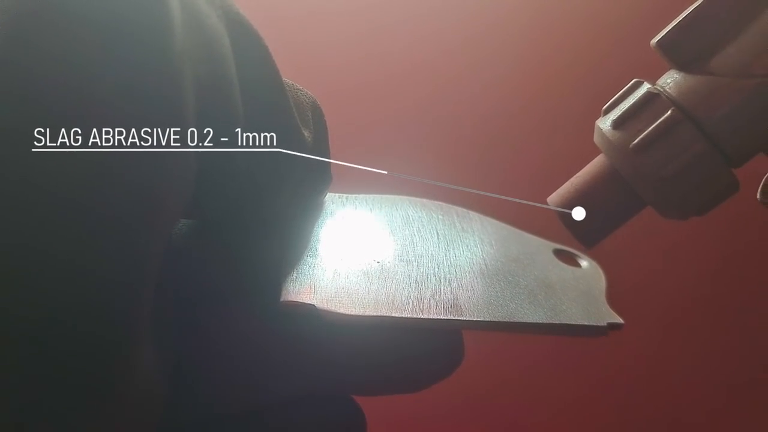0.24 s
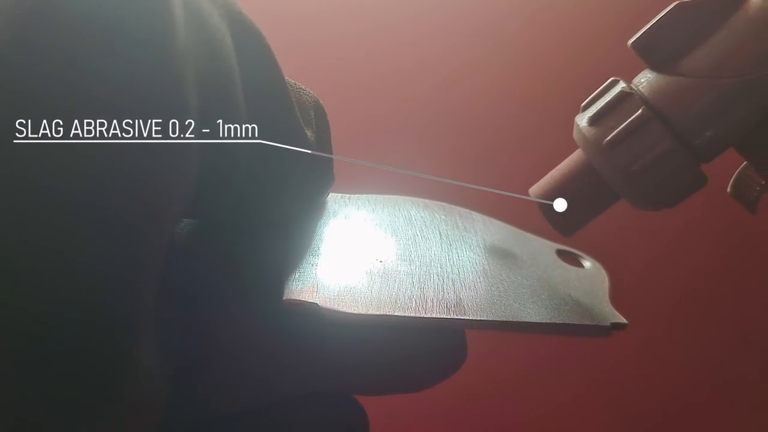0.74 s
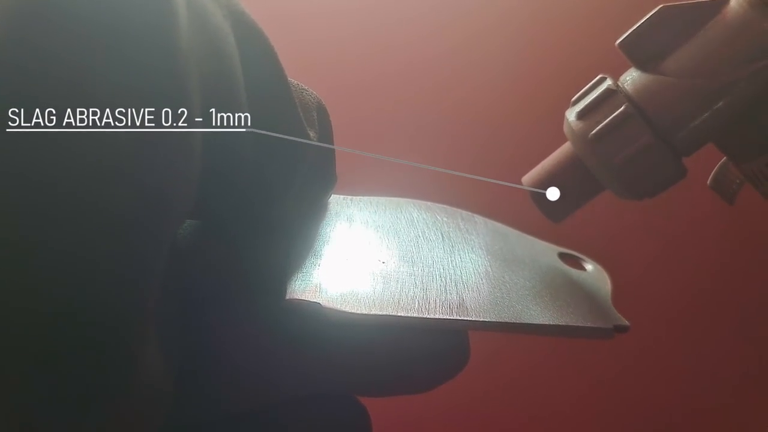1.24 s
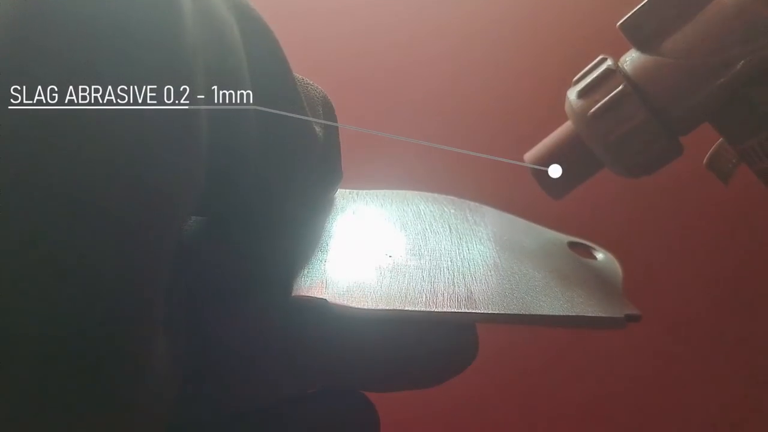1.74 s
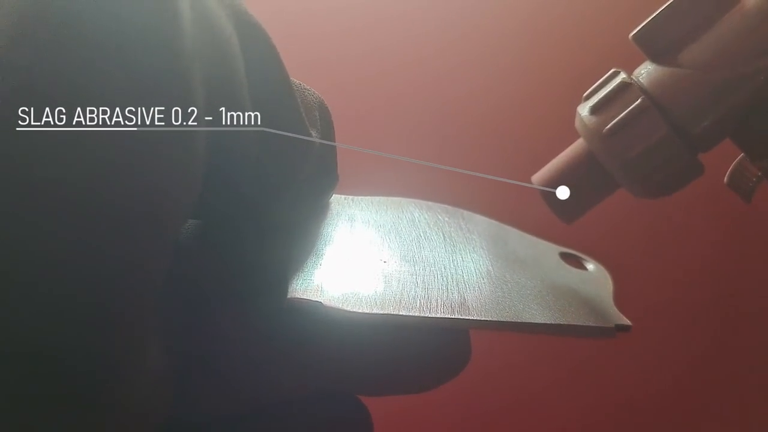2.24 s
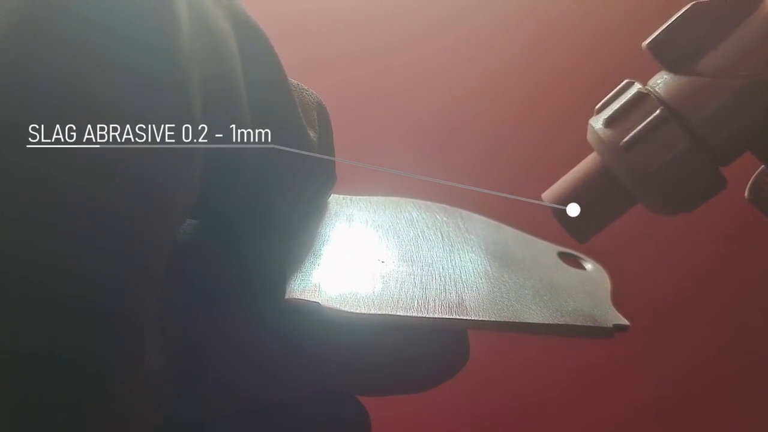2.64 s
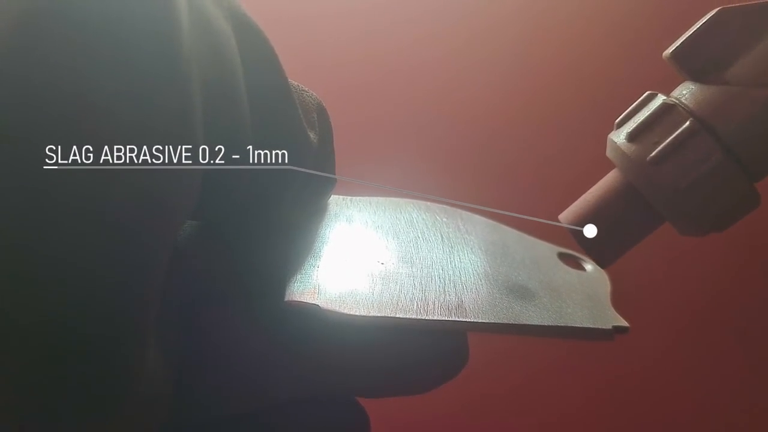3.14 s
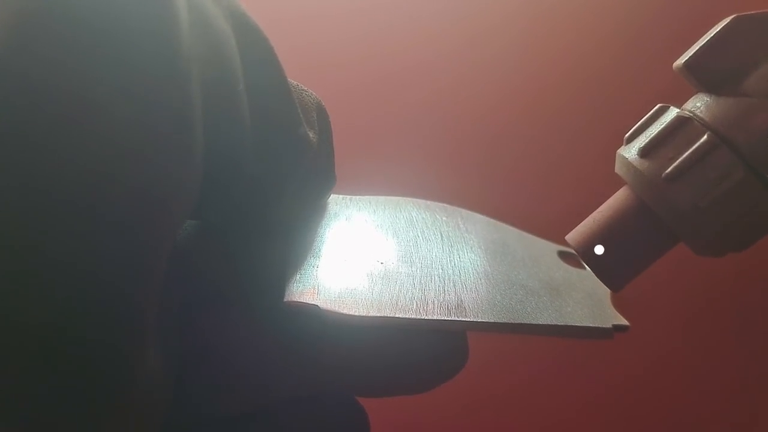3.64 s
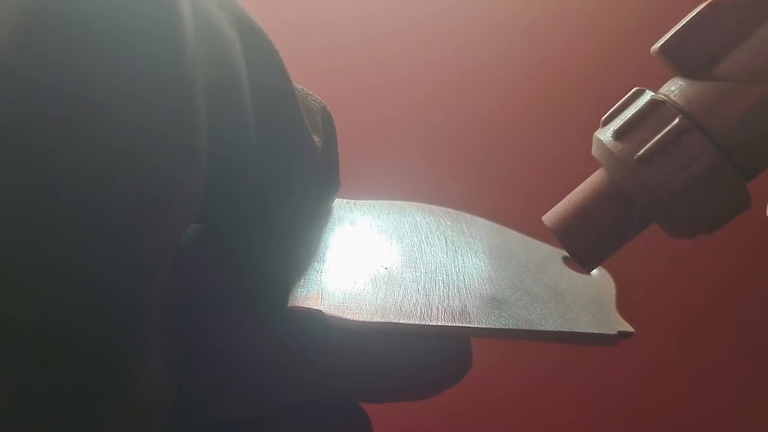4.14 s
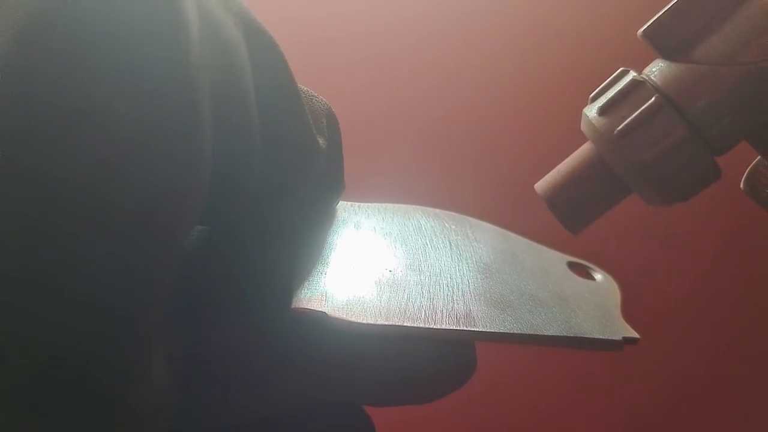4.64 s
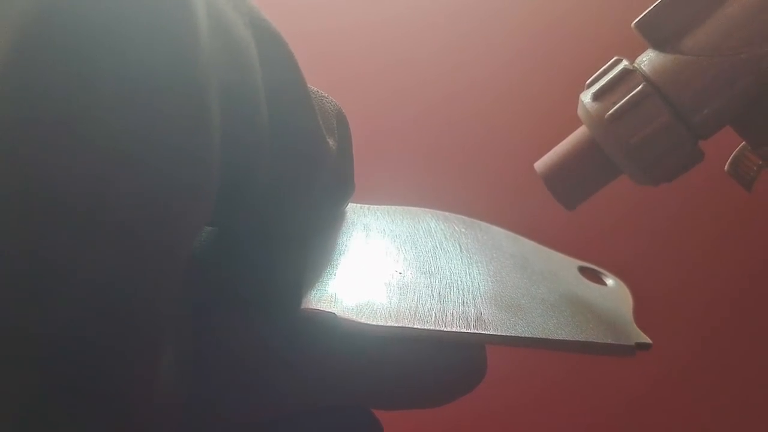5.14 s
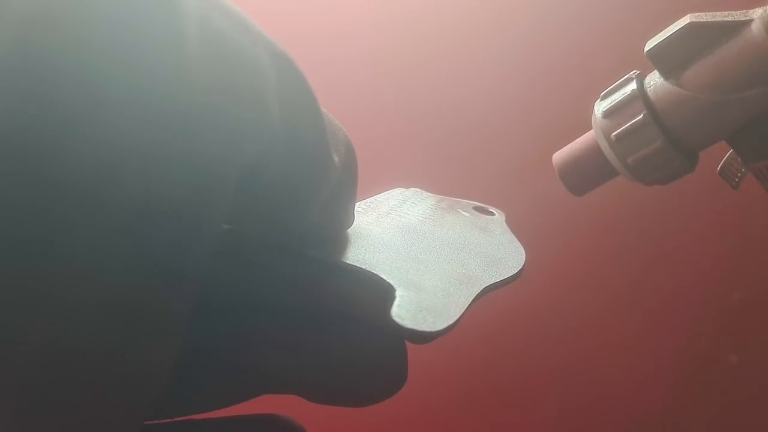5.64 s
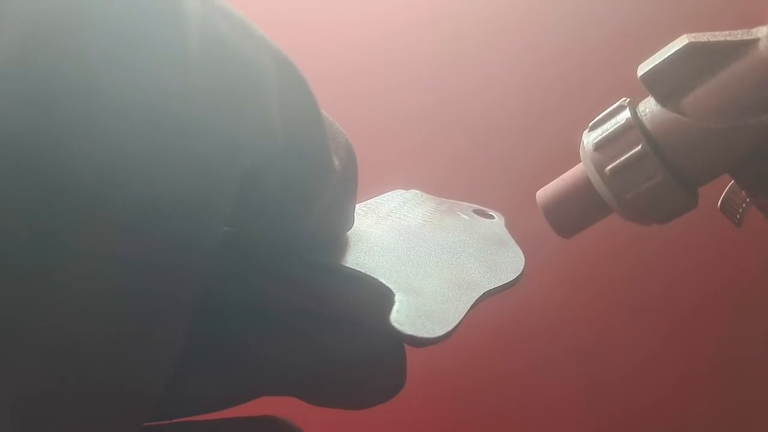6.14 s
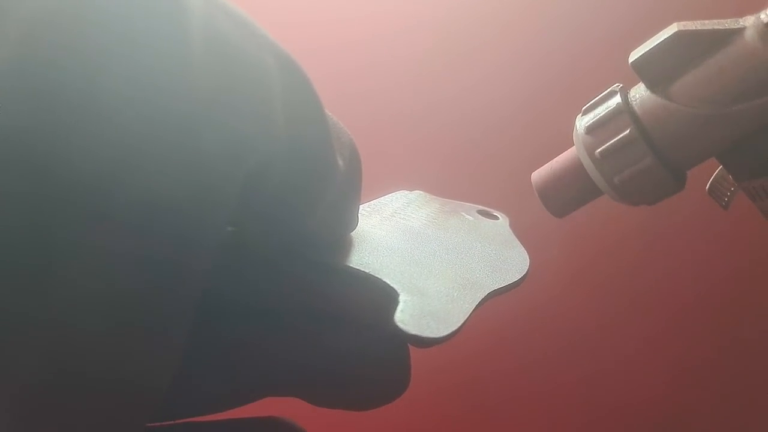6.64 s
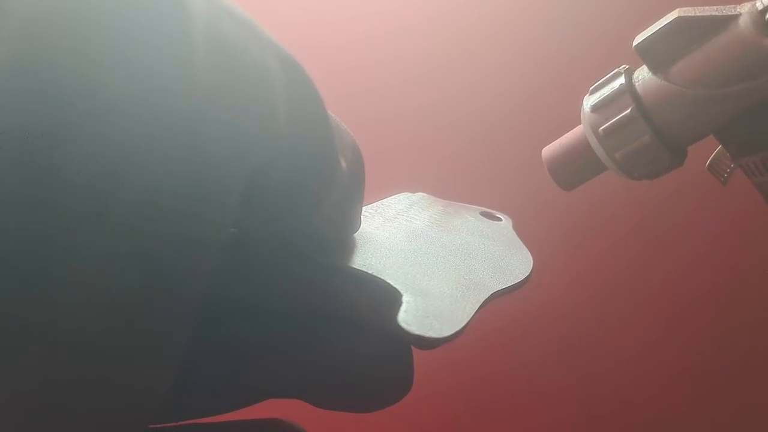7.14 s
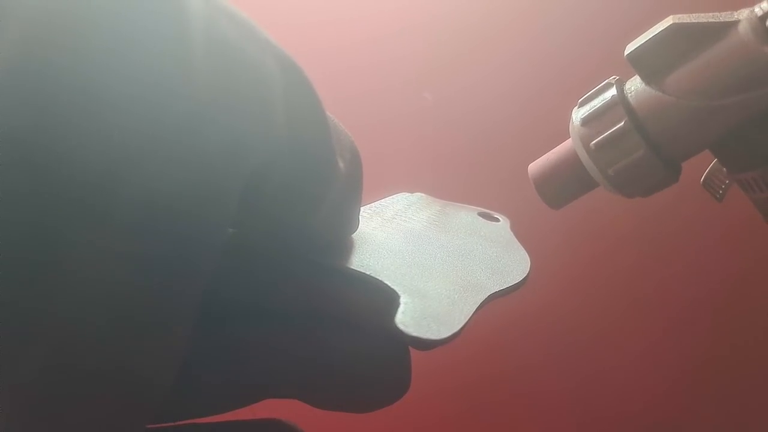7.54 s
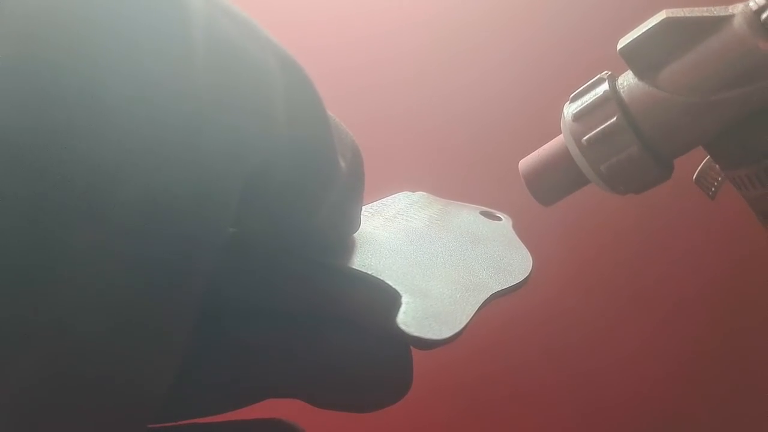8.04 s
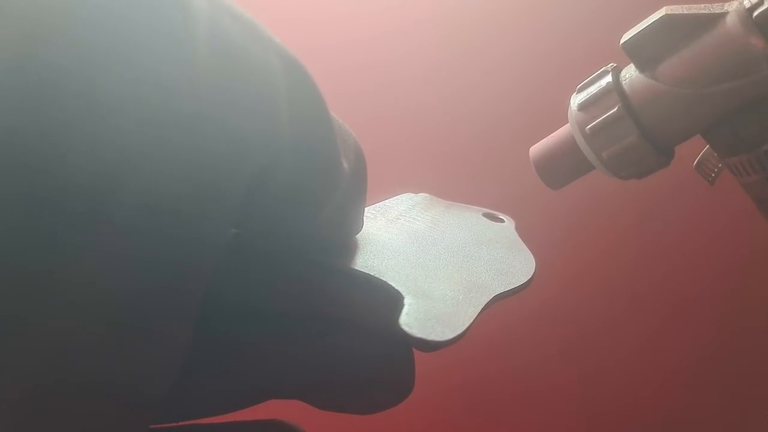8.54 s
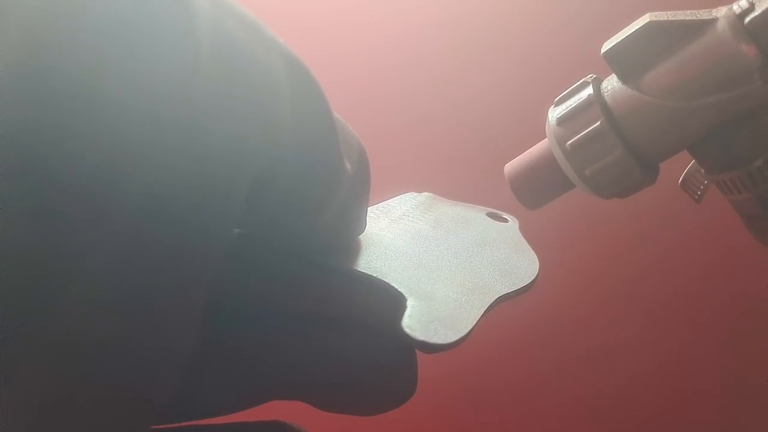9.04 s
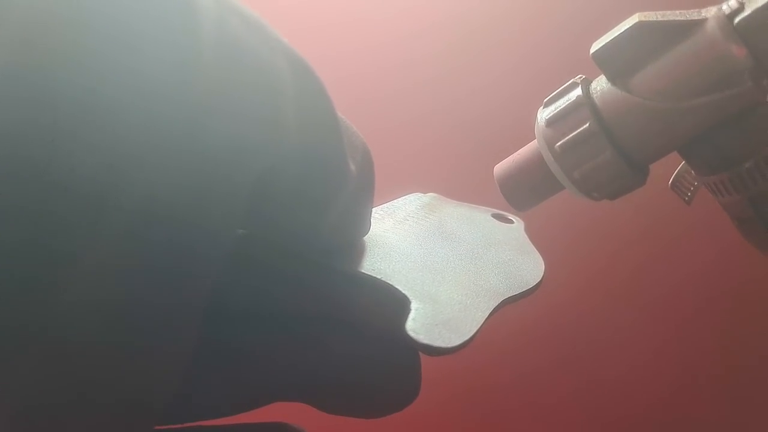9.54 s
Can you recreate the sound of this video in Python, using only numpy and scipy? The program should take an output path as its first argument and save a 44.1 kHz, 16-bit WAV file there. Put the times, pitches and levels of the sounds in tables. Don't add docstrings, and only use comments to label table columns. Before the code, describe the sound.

A shrill, dense hiss of compressed air is running from the first instant and never stops, very bright with little bass, louder on the right because the gloved hand and part shade the left. The close stereo microphone sits inside a small metal cabinet with a short, tight reverberation. Grit sizzles on the steel in swells around 1.2, 1.8, 3.4 and 3.9 seconds. Rebounding grains crackle and tick, thickest from 1.5 to 1.9, with soft low puffs of air on the left near 0.7, 1.3 and 3.7. At about 5.2 the gun and part abruptly change place: buffeting ends, the left hiss drops, pelting thins and the sizzle becomes lower and duller. Strong bursts of sizzle come near 5.6 and 7.1, a calmer stretch around 7.7 to 8.1, then more passes at 8.5 and 9.7. Panels resonate faintly and a fan motor hums very quietly throughout, with the hiss still going at the end.

```python
import sys
import numpy as np
from scipy import signal
from scipy.fft import rfft, irfft, next_fast_len
from scipy.io import wavfile
from scipy.ndimage import map_coordinates

SR = 44100
rng = np.random.default_rng(int(sys.argv[2]) if len(sys.argv) > 2 else 0)


def to_wav(sig):
    pcm = np.clip(np.atleast_2d(sig), -1, 1) * 32767
    pcm = np.round(pcm).astype(np.int16)
    wavfile.write(sys.argv[1], SR, pcm.T)


def gain_from_db(level_db):
    decades = np.asarray(level_db, float) / 20
    return 10 ** decades


N = 431722
MOVE_S = 5.2
ECHO_LENGTH, HOP = 4096, 14336
TOP_HZ = 15770
PER_HZ = np.sqrt(SR / 2)

# (frequency [Hz], rms level [dB])
MOTOR_LINES = [
    (92, -68.5),
    (322.3, -72.5),
]
# (frequency [Hz], width [Hz], level [dB])
DUCT_MODES = [
    (335, 12, -8),
    (397.5, 15, 0),
    (486, 20, -7),
]
# (frequency [Hz], left level [dB per Hz], right level [dB per Hz])
RUMBLE_SPECTRUM = [(20, -108, -108), (50, -93.5, -96), (90, -102, -92.5), (182, -106, -106),
                   (317, -99, -99), (463, -100, -100), (526, -112, -112)]
# (frequency [Hz], level [dB per Hz])
GUST_SPECTRUM = [(20, -19), (60, 7.5), (120, 0), (250, -9.5), (500, -14)]
# (time [s], half length [s], level [dB])
PUFFS = [
    (.72, .12, -70),
    (1.25, 0.054, -72),
    (2.3, .08, -81),
    (3.68, 0.032, -67),
    (4.98, 0.063, -80),
]
BUFFET_DB, BUFFET_SWING_DB = -71, 0.6
# (frequency [Hz], left level [dB per Hz], right level [dB per Hz])
ROAR_BEFORE = [(165, -86, -100.5), (350, -93, -96.5), (603, -91, -93.5), (1000, -93, -91),
               (1590, -91.5, -99), (2300, -90, -94), (3130, -87, -88.5), (4500, -86.5, -82.5),
               (5260, -85.5, -84), (5900, -81, -79), (6130, -102, -79), (7580, -103, -81),
               (8100, -122, -102), (8450, -99, -82)]
ROAR_AFTER = [(174, -104, -104), (260, -102, -102), (348, -96, -95), (533, -99.5, -98.5), (710, -92.5, -94),
              (990, -95, -94), (1590, -99.5, -88), (2300, -90.5, -90), (2830, -92.5, -91), (3350, -99, -86),
              (4170, -83, -89), (4680, -103, -80), (5700, -97, -81), (5940, -99, -78), (7220, -91, -77),
              (8340, -110, -97), (9400, -85, -76)]
# (frequency [Hz], width [Hz], level [dB])
WALL_MODES_BEFORE = [(1300, 30, -12), (1800, 30, -12), (2000, 50, -11), (2290, 40, -9), (2470, 50, -8),
                     (2740, 50, -6), (3120, 120, -7), (3700, 100, -6), (4480, 86, -10), (4950, 60, -6),
                     (5350, 60, -6), (5550, 200, -5), (5780, 200, -5), (6240, 75, -2), (6760, 90, -3),
                     (7080, 70, -4)]
WALL_MODES_AFTER = [(720, 16, -11), (930, 50, -12), (1300, 36, -9), (1500, 90, -12), (1790, 60, -8),
                    (1885, 40, -10), (2127, 50, -8), (2296, 40, -5), (2478, 44, -3), (2605, 35, -5),
                    (2702, 35, -4), (2830, 70, -4), (3055, 60, -3), (3200, 80, -5), (3420, 90, 0),
                    (3700, 90, -3), (3900, 50, -4), (4315, 50, -3), (4570, 70, 0), (4835, 50, -4),
                    (5330, 60, -6)]
# (time [s], peak level [dB], port [0 left, 1 right])
LARGE_GRAINS = [(0.1525, -28, 0), (0.179, -31, 0), (.258, -31, 0), (.566, -43, 0), (0.576, -39, 0),
                (.872, -35, 0), (1.083, -38, 0), (.492, -43, 0), (1.071, -38, 0), (1.273, -36, 0),
                (1.397, -34, 0), (6.961, -35, 0), (.966, -34, 1), (.345, -42, 0), (1.478, -37, 0),
                (1.914, -34, 0), (1.933, -34, 0), (2.583, -43, 0), (3.242, -34, 0), (3.644, -34, 0),
                (4.054, -39, 0), (4.265, -40, 1), (4.33, -37, 0), (5.444, -42, 1), (5.561, -40, 1)]
# (time [s], half length [s], level [dB])
SHOWERS = [(1.08, 0.014, -59), (1.27, 0.036, -60), (1.5, .02, -58), (1.555, 0.037, -52),
           (1.61, 0.027, -51.5), (1.7, 0.05, -57), (1.79, .02, -54), (1.835, 0.035, -51), (1.9, 0.022, -58),
           (3.25, .03, -70), (4.01, 0.095, -58), (4.45, 0.066, -61), (5.36, 0.073, -64), (5.55, .09, -53.5),
           (6.1, 0.056, -59), (6.35, .14, -62), (6.95, 0.08, -64), (7.17, 0.037, -55), (7.75, 0.15, -59),
           (8.6, .12, -72), (9.2, 0.34, -62)]
DRIZZLE_DB, DRIZZLE_SWING_DB = -61, 0.5
# (frequency [Hz], level [dB per Hz])
GRAIN_SPECTRUM = [(90, 1), (300, -2), (1500, -3), (4000, -4.5), (7000, -2), (10000, -0.5)]
# (time squarest [s], half length [s], sizzle level [dB], push on the walls [dB])
PASSES = [(0, .06, -52, -3), (1.175, 0.28, -51.5, 0), (1.577, 0.12, -52.5, 3), (1.84, 0.23, -50, -3),
          (2.1, 0.1, -58, -3), (2.295, 0.1, -62, -4), (3.4, 0.46, -53, -1), (3.848, 0.12, -50, 0),
          (4.15, 0.21, -53, -9), (5.045, 0.067, -52, 2.5), (5.274, 0.082, -48, 1), (5.415, 0.072, -52, -3),
          (5.576, 0.13, -43, -5), (5.78, 0.12, -49, -1.5), (6.858, 0.15, -55, 1.5), (7.136, 0.11, -44.5, 0),
          (7.35, 0.11, -59, 2), (7.65, 0.1, -69, -1), (8.11, 0.18, -68, 1.5), (8.477, 0.14, -51.5, 0.5),
          (8.758, 0.13, -54, 1), (9.297, 0.26, -58, 3), (9.7, 0.57, -52.5, -0.5)]
GRAZE_DB, WALL_REST_DB = -60.5, -5
# (frequency [Hz], left level [dB per Hz], right level [dB per Hz])
PART_BEFORE = [(2000, -102, -106), (2980, -91, -87), (3970, -84, -71.5), (4800, -104, -72.5),
               (5600, -92, -73), (6400, -87, -67), (7440, -84, -66), (7900, -103, -84)]
PART_AFTER = [(1240, -100, -101), (2080, -100, -98), (2480, -80, -77.5), (2750, -83, -81.5),
              (3080, -86, -81), (3400, -67.5, -77), (4000, -85, -72), (4570, -75, -71), (5050, -81, -68),
              (5600, -88, -70), (6230, -88, -76), (6950, -90, -71), (8250, -91, -77)]
# (frequency [Hz], left level [dB per Hz], right level [dB per Hz])
JET_SPECTRUM = [(8200, -87, -83), (9000, -88, -82.5), (9400, -86, -79), (9900, -78, -75), (10800, -76, -69),
                (11600, -74, -65), (12500, -73, -64.5), (13400, -69.5, -66), (14200, -71, -68),
                (15000, -74, -69), (15600, -75.5, -71)]
# (time [s], left level [dB], right level [dB], left dulling [dB], right dulling [dB])
AIM = [(0.0, -4.8, 0.5, -0.0, -1), (0.3, -6, -1.5, 2.5, 1), (0.6, -5.5, 0.2, 0.5, -1.5),
       (1.0, -2.5, 0, -2.2, -0.5), (1.3, -4.3, -0.5, 1, 0.5), (1.55, -7, 0, 2.6, 0.3),
       (1.85, -7.5, 0, 2, 0.5), (2.3, -4.2, -1.3, 0, 0.5), (2.6, -4, -0.3, -0.5, -1.5),
       (3.1, -4.5, -0.1, 0, -1), (3.6, -6, 0.3, -1, -0.5), (4.1, -5.3, 0.0, 1, -0.5),
       (4.6, -5, -0.4, 1.5, 0.4), (4.9, -4.5, -0.4, 0, 0), (5.14, -4.8, 1, -1.3, -0.5),
       (5.26, -10, -0.5, 2, 0.5), (5.55, -9.5, -0.0, 0.5, -0.3), (5.9, -9, -1, 0, 0.6),
       (6.3, -7.5, 0, -1, 0), (7.0, -9.5, -0.7, 1.0, 1), (7.9, -7.9, -0.0, -1.6, -1.3),
       (8.5, -8.5, -0.5, 0.5, 1.3), (9.1, -8.5, 0.1, 1, -1), (9.79, -8, 0.5, 1, 0)]
JET_DB = -28.5
KNEE_HZ, KNEE_WIDTH_HZ = 12000, 900


def unit(x):
    return x / np.sqrt(np.mean(np.abs(x) ** 2) + 1e-20)


def shape(points, hz):
    f, *columns = np.transpose(points)
    below = np.maximum(np.log2(f[0] / (hz + 1)), 0)
    above = np.maximum(np.log2((hz + 1) / f[-1]), 0)
    octaves_outside = below + above
    return gain_from_db([np.interp(np.log(hz + 1), np.log(f), c) - 40 * octaves_outside for c in columns])


def coloured(x, points):
    m = next_fast_len(N + ECHO_LENGTH)
    gain = shape(points, np.fft.rfftfreq(m, 1 / SR))
    return irfft(rfft(x, m) * gain, m)[..., :N]


def curves(rows):
    s, *columns = np.transpose(rows)
    return [np.interp(np.arange(N) / SR, s, c) for c in columns]


def wobble(rate):
    coarse = np.arange(0, N + 64, 64)
    knots = rng.standard_normal(int(N * rate / SR) + 4)
    smooth = map_coordinates(knots, [coarse * rate / SR])
    return np.interp(np.arange(N), coarse, smooth)


def swells(rows, rest_db):
    coarse = np.arange(0, N + 64, 64)
    power = gain_from_db(2 * rest_db)
    for s, half, db in rows:
        power = power + gain_from_db(2 * db) * np.exp(-((coarse / SR - s) / half) ** 2)
    return np.interp(np.arange(N), coarse, 10 * np.log10(power))


def moved():
    return np.clip((np.arange(N) / SR - MOVE_S) / 0.024, 0, 1)


def in_cabinet(t60, moving, count):
    decay = gain_from_db(-60 * np.arange(ECHO_LENGTH) / SR / t60)
    steps = N // HOP + 2
    spots = rng.standard_normal((count, steps + 1, HOP))
    pieces = np.concatenate([spots[:, :-1], spots[:, 1:]], axis=2)
    fade = np.sin(np.pi * np.arange(2 * HOP) / (2 * HOP))
    m = 2 * HOP + ECHO_LENGTH
    changing = rfft(rng.standard_normal((2, count, steps, ECHO_LENGTH)) * decay, m)
    place = (np.arange(steps) * HOP > MOVE_S * SR).astype(int)
    still = rfft(rng.standard_normal((2, count, 2, ECHO_LENGTH)) * decay, m)[:, :, place]
    share = np.clip(moving, 0, 1)
    paths = np.sqrt(share) * changing * rfft(pieces * fade, m)
    paths = paths + np.sqrt(1 - share) * still * rfft(pieces * fade ** 2, m)
    answers = irfft(paths.sum(axis=1), m)
    ports = np.zeros((2, steps + 3, HOP))
    for k in range(3):
        slab = answers[:, :, k * HOP:(k + 1) * HOP]
        ports[:, k:k + steps, :slab.shape[2]] += slab
    return unit(ports.reshape(2, -1)[:, HOP:HOP + N])


def ringing(modes, alike):
    m = next_fast_len(N + ECHO_LENGTH)
    f = np.fft.rfftfreq(m, 1 / SR)
    power = sum((gain_from_db(db) / (1 + (2 * (f - hz) / width) ** 2)) ** 2 for hz, width, db in modes)
    blast = alike * rng.standard_normal(N) + rng.standard_normal((2, N))
    return unit(irfft(rfft(blast, m) * np.sqrt(power), m)[:, :N])


def fan():
    t = np.arange(N) / SR
    slip = 0.22 * wobble(2.87)
    lines = np.zeros(N)
    for hz, db in MOTOR_LINES:
        level = np.sqrt(2) * gain_from_db(db + 0.59 * wobble(3.2))
        lines += level * np.sin(2 * np.pi * hz * t + slip * hz / 220)
    whistle = gain_from_db(-76.0 + 1.5 * wobble(4)) * ringing(DUCT_MODES, alike=4.9)
    air = rng.standard_normal(N) + 0.29 * rng.standard_normal((2, N))
    rumble = PER_HZ * coloured(unit(air), RUMBLE_SPECTRUM)
    return lines * gain_from_db([[-.6], [.6]]) + whistle + rumble


def buffet():
    gusts = coloured(rng.standard_normal(N), GUST_SPECTRUM)[0]
    lumps = unit(gain_from_db(2.2 * wobble(18)) * gusts)
    gust_db = swells(PUFFS, BUFFET_DB) + BUFFET_SWING_DB * wobble(5.17)
    return gain_from_db(gust_db + 9.5) * (1 - moved()) * lumps * [[1], [.04]]


def roar():
    swirl = in_cabinet(t60=0.084, moving=0.64, count=2)
    early = coloured(swirl, ROAR_BEFORE)
    late = coloured(swirl, ROAR_AFTER)
    surge_db = .8 * wobble(8) + .8 * wobble(15)
    return PER_HZ * gain_from_db(surge_db - 3.0) * (early * (1 - moved()) + late * moved())


def walls():
    pushes = [(s, half, push) for s, half, _, push in PASSES]
    drive = gain_from_db(swells(pushes, WALL_REST_DB) + 0.94 * wobble(9))
    early = gain_from_db(-57.0) * np.sqrt(1 - moved()) * ringing(WALL_MODES_BEFORE, alike=0.48)
    late = gain_from_db(-56.5) * np.sqrt(moved()) * ringing(WALL_MODES_AFTER, alike=0.5)
    return drive * (early + late)


def pelting():
    hit = rng.random((2, N)) < 2500 / SR
    size_db = np.minimum(3.55 * rng.exponential(1, (2, N)), 17)
    sizes = gain_from_db(size_db) * rng.choice([-1, 1], (2, N))
    clumps = gain_from_db(1.7 * wobble(40) + 1.75 * np.array([wobble(30), wobble(30)]))
    grains = unit(coloured(hit * sizes * clumps, GRAIN_SPECTRUM))
    fall_db = swells(SHOWERS, DRIZZLE_DB) + DRIZZLE_SWING_DB * wobble(23)
    port_db = np.array([[6.5], [5.0]]) - np.array([[9.0], [5.5]]) * moved()
    shower = gain_from_db(fall_db + port_db) * grains
    big = np.zeros((2, N))
    for s, db, port in LARGE_GRAINS:
        big[int(port > .5), round(s * SR)] = gain_from_db(db + 17.0)
    return shower + coloured(big, GRAIN_SPECTRUM)


def part():
    grit = in_cabinet(t60=0.085, moving=0.79, count=2)
    early = unit(coloured(grit, PART_BEFORE))
    late = unit(coloured(grit, PART_AFTER))
    sizzle = early * (1 - moved()) + late * moved()
    sweep_db = swells([row[:3] for row in PASSES], GRAZE_DB)
    return gain_from_db(sweep_db + 1.0 + 0.62 * wobble(12) + 0.9 * wobble(22)) * sizzle


def jet():
    left_db, right_db, *dull_db = np.array(curves(AIM))
    dull_db = np.array(dull_db)
    hiss = coloured(in_cabinet(t60=.07, moving=.72, count=3), JET_SPECTRUM)
    hiss = np.array([unit(port) for port in hiss])
    m = next_fast_len(N)
    below = .5 - .5 * np.tanh((np.fft.rfftfreq(m, 1 / SR) - KNEE_HZ) / KNEE_WIDTH_HZ)
    body = irfft(rfft(hiss, m) * below, m)[:, :N]
    edge = hiss - body
    hiss = gain_from_db(1.15 * dull_db) * body + gain_from_db(-0.35 * dull_db) * edge
    flutter_db = 0.19 * wobble(9) + 0.22 * np.array([wobble(10), wobble(16)])
    return gain_from_db(JET_DB + flutter_db + np.array([left_db, right_db])) * hiss


def scene():
    return fan() + buffet() + roar() + walls() + pelting() + part() + jet()


def top_cut(x):
    return signal.sosfilt(signal.butter(12, 15930, fs=SR, output="sos"), x)


def record(dry):
    m = next_fast_len(N)
    band = np.fft.rfftfreq(m, 1 / SR) < TOP_HZ
    mix = irfft(rfft(dry, m) * band, m)[:, :N]
    return top_cut(mix)


dry = scene()
out = record(dry)
to_wav(out)
```